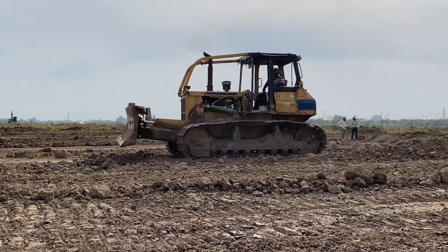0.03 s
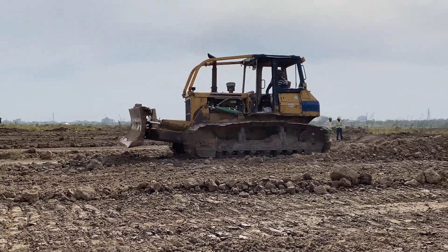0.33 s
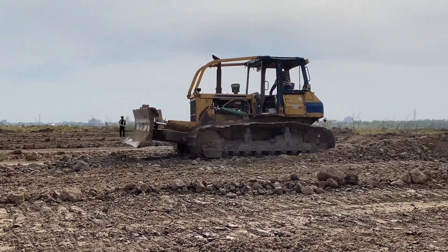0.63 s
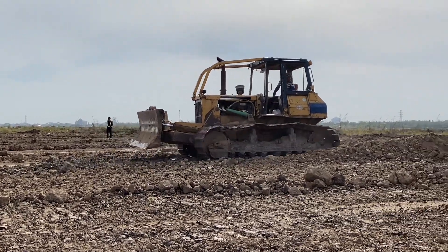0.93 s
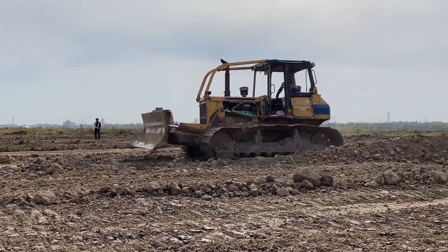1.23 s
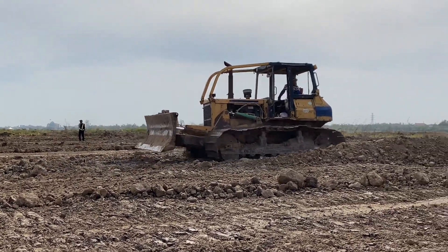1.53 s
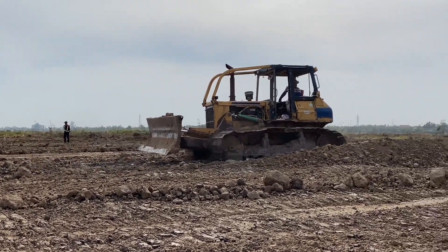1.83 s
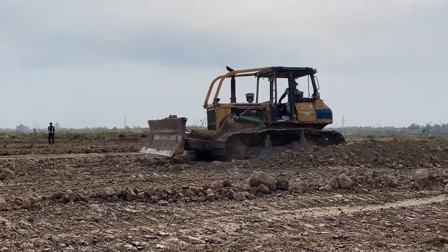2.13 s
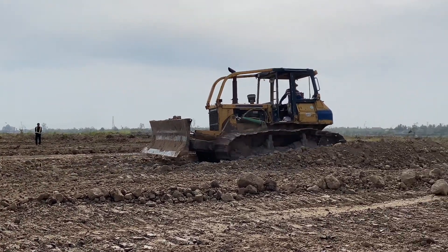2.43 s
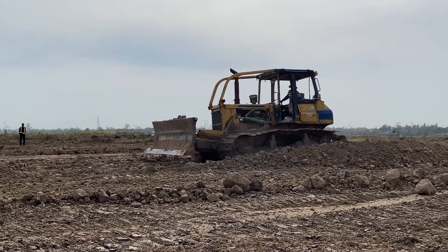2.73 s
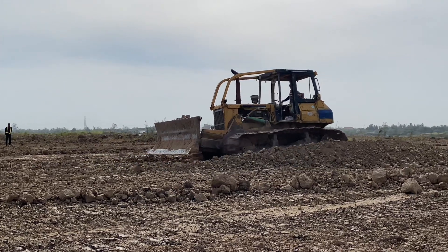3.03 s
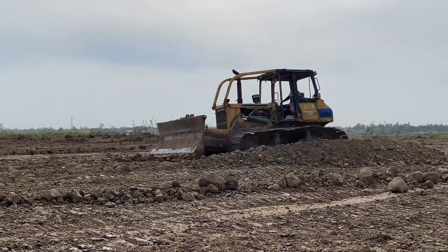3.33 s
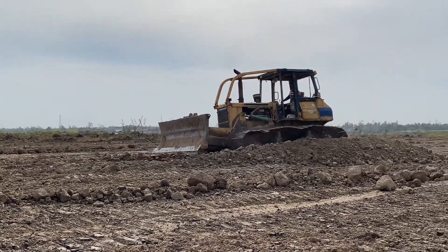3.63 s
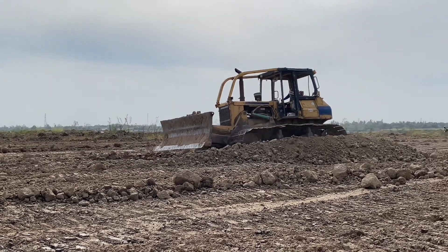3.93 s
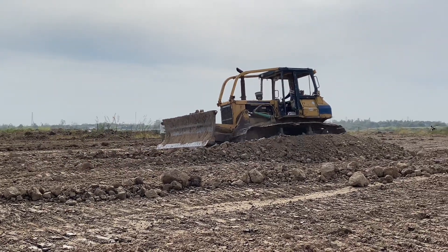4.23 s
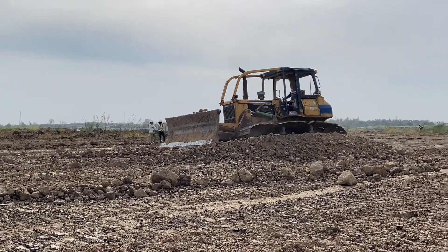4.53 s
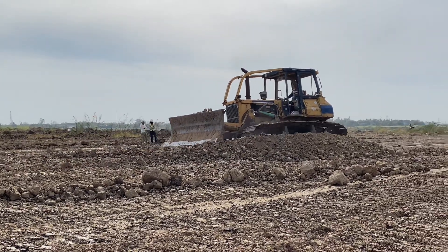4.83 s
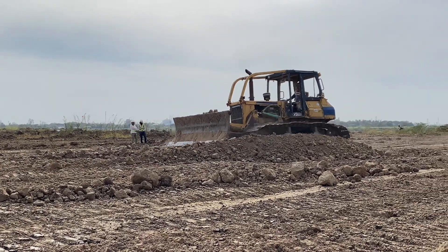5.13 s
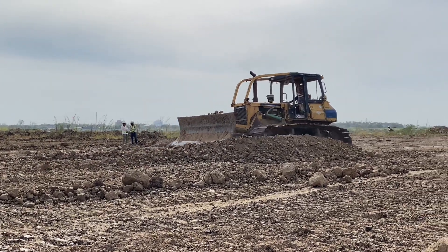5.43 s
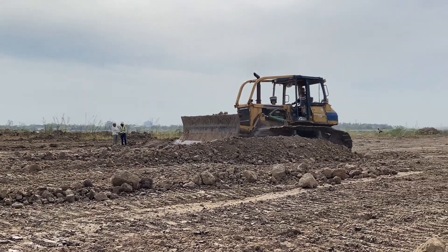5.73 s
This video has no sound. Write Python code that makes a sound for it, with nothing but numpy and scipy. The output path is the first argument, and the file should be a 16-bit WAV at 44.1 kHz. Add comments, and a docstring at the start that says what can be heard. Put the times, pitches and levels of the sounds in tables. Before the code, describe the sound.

A diesel bulldozer drones and clatters while its steel tracks grind, knock and squeak, with gusts buffeting the microphone.

```python
"""An open, windy site: a diesel bulldozer crawls over a mound of soil.
The exhaust drones at the firing rate and each firing makes the block clatter.
The steel tracks grind grit, crush stones, scrape, knock on the rollers and squeak on dry pins.
Gusts rumble, buffet and thump on the two ports of the microphone."""
import sys
import numpy as np
from scipy import signal
from scipy.fft import rfft, irfft
from scipy.io import wavfile
from scipy.ndimage import uniform_filter1d

SR = 44100
rng = np.random.default_rng(int(sys.argv[2]) if len(sys.argv) > 2 else 0)


def transcribe(signal):
    """Save signal, clipped to [-1, 1], as a 16-bit WAV file at the path in sys.argv[1]."""
    frames = np.atleast_2d(signal).T
    limited = np.clip(frames, -1, 1)
    pcm = np.round(limited * 32767).astype(np.int16)
    wavfile.write(sys.argv[1], SR, pcm)


N = 263718
TIME, FREQS = np.arange(N) / SR, np.fft.rfftfreq(N, 1 / SR)
LINK_PERIOD_S, FIRST_LINK_S = 0.339, 0.32  # links bending over the sprocket

# machine slowly moving away: (time [s], clatter [dB], grinding [dB])
MACHINE_LEVELS = [(0, -25.5, -40), (.3, -25.5, -39.5), (.9, -25.5, -43), (2.3, -27, -46.5),
                  (3.1, -26, -43.5), (3.7, -28, -45), (4.1, -28.5, -43), (4.5, -27.5, -44),
                  (5.98, -28.5, -44.5)]
# wind between gusts: (time [s], rumble [dB], buffeting [dB])
BREEZE_LEVELS = [(0, -30, -29.5), (1.1, -25.5, -31), (2, -27.5, -31), (2.55, -24.5, -34),
                 (2.9, -23.5, -30.5), (3.7, -26.5, -30), (4.4, -22, -32.5), (5.1, -27, -30),
                 (5.98, -26, -26.5)]
# link friction: (time [s], level [dB])
RUB_LEVELS = [(0, -48), (.9, -41), (1.7, -37.5), (2, -45), (3.2, -47), (4.05, -34.5), (4.3, -48),
              (4.7, -35.5), (5.2, -38.5), (5.98, -41)]


def amp(db):
    """Decibels to gain."""
    return 10 ** (np.asarray(db) / 20)


def unit(x):
    """Scale to rms 1."""
    return x / np.sqrt(np.mean(x ** 2) + 1e-20)


def curve(rows, column=1):
    """One column of a time table at every sample."""
    rows = np.asarray(rows)
    return np.interp(TIME, rows[:, 0], rows[:, column])


def colour(x, spectrum):
    """Filter by (frequency [Hz], level [dB]) points; rms 1."""
    hz, db = np.transpose(spectrum)
    size = x.shape[-1]
    gain = amp(np.interp(np.log(np.fft.rfftfreq(size, 1 / SR) + 1), np.log(hz), db))
    return unit(irfft(rfft(x) * gain, size))


def noise(spectrum, shape=N):
    """Coloured noise, rms 1."""
    return colour(rng.standard_normal(shape), spectrum)


def wander(lo_hz, hi_hz):
    """Random drift between two rates, rms 1."""
    band = FREQS / (FREQS + lo_hz) / (1 + (FREQS / hi_hz) ** 2)
    return unit(irfft(rfft(rng.standard_normal(N)) * band, N))


def port_noise(side_db):
    """Noise at two ports: a common part and an opposed part."""
    mid, side = rng.standard_normal((2, N))
    return np.array([mid + amp(side_db) * side, mid - amp(side_db) * side])


def add(mix, start_s, sound):
    """Mix a sound in, cut at the end."""
    part = mix[max(round(start_s * SR), 0):][:len(sound)]
    part += sound[:len(part)]


def patchy(x, wide_db, ring_db):
    """Shift colour in brief wide patches, and in longer narrow ones where steel plates ring on."""
    for window, db in ((512, wide_db), (2048, ring_db)):
        frames = signal.stft(x, nperseg=window)[2]
        patches = uniform_filter1d(rng.standard_normal(frames.shape), size=3, axis=0)
        patches = uniform_filter1d(patches, size=4, axis=1)
        x = signal.istft(frames * amp(db * unit(patches)))[1][:N]
    return unit(x)


def scatter(x, t60_s):
    """Short spray of echoes off hull and clods."""
    t = np.arange(SR // 4) / SR
    tail = rng.standard_normal(len(t)) * amp(-60 * t / t60_s)
    return signal.oaconvolve(x, tail / np.linalg.norm(tail))[:N]


def gusts(rise_s=0.013, fall_s=0.034, lull_flutter_db=-40):
    """Buffeting and flutter levels [dB]: each gust rises fast, holds, falls back to the breeze."""
    # gusts at the microphone: (start [s], length [s], buffeting [dB], flutter [dB])
    blasts = [(0, 0.12, -20.5, -34.5), (0.224, 0.33, -20, -29.5), (0.573, .08, -18, -28),
              (0.744, 0.14, -23, -46), (0.886, 0.18, -21, -29), (1.175, 0.13, -27, -21),
              (1.338, 0.14, -29.5, -24.5), (1.67, 0.076, -35, -27.5), (1.888, .19, -47, -27),
              (2.662, 0.098, -27, -19), (2.832, 0.2, -27.5, -20.5), (3.07, 0.15, -41, -27),
              (3.313, 0.27, -32.5, -51), (3.535, 0.039, -23, -25.5), (3.919, 0.17, -29, -30.5),
              (4.312, 0.3, -25, -30), (4.846, 0.043, -24, -22.5), (5.52, 0.19, -27.5, -31),
              (5.864, 0.077, -26, -29.5)]
    buffet_power, flutter_power = amp(curve(BREEZE_LEVELS, column=2)) ** 2, amp(lull_flutter_db) ** 2
    for start_s, length_s, buffet_db, flutter_db in blasts:
        onset = (1 + np.tanh((TIME - start_s) / rise_s)) / 2
        release = (1 - np.tanh((TIME - start_s - length_s) / fall_s)) / 2
        buffet_power += onset * release * amp(buffet_db) ** 2
        flutter_power += onset * release * amp(flutter_db) ** 2
    return 10 * np.log10(buffet_power), 10 * np.log10(flutter_power)


def wind(lump_db=3.5, flicker_db=3.0, rumble_follow=0.17):
    """Eddies on the ports: deep rumble, lumpy buffets, brighter flutter in fast gusts."""
    # wind spectra: (frequency [Hz], level [dB])
    rumble_spectrum = [(15, -50), (30, -23), (45, 2.5), (62, 8), (80, 12.5), (110, 7.5), (160, -9.5),
                       (400, -72)]
    buffet_spectrum = [(30, -46), (70, -11), (130, -0.5), (200, -3), (290, -5.5), (450, -16), (900, -30),
                       (3000, -96)]
    flutter_spectrum = [(80, -30), (220, -10.5), (350, 2), (520, 1.5), (750, 0), (1000, -10.5), (1500, -25),
                        (2200, -57), (5000, -95)]
    buffet_db, flutter_db = gusts()
    rumble_db = curve(BREEZE_LEVELS) + rumble_follow * (buffet_db - buffet_db.mean())
    eddies = wander(6, 24)
    rumble = colour(port_noise(side_db=-14), rumble_spectrum)
    buffet = colour(port_noise(side_db=-5) * amp(lump_db * eddies), buffet_spectrum)
    turbulence = port_noise(side_db=-6.5) * amp(flicker_db * unit(eddies + wander(2.3, 29)))
    flutter = colour(turbulence, flutter_spectrum)
    return amp(rumble_db) * rumble + amp(buffet_db + 2) * buffet + amp(flutter_db + 4) * flutter


def thumps(rise_s=0.0009, decay_s=0.0056, sag_per_s=5.7, max_lean=0.36):
    """An eddy bursts on a port: a push that dies in a few sagging cycles, stronger on one side."""
    # eddy bursts: (start [s], level [dB], pitch [Hz])
    bursts = [(.23, -1, 149), (.405, -2, 168), (.602, 3, 235), (.958, -3, 161), (1.176, 3, 526),
              (1.279, -1, 546), (1.291, -1, 453), (1.451, -1, 494), (1.896, -8, 442), (2.714, 1, 375),
              (2.881, -5, 480), (2.966, -7, 613), (3.55, -8, 395), (4.862, -3, 451.3)]
    out, t = np.zeros((2, N)), np.arange(SR // 20) / SR
    envelope = (1 - np.exp(-t / rise_s)) * np.exp(-t / decay_s)
    for (start_s, db, hz), (side, offset) in zip(bursts, rng.random((len(bursts), 2))):
        cycles = np.cumsum(hz * np.exp(-sag_per_s * t)) / SR
        push = amp(db - 7) * envelope / envelope.max() * np.sin(2 * np.pi * (cycles + offset))
        lean = max_lean * (2 * side - 1)
        add(out[0], start_s, (1 + lean) * push)
        add(out[1], start_s, (1 - lean) * push)
    return out


def rubbing(gain_db=-4, beat_db=1.0):
    """Links rub hoarsely about their main resonance, harder as each one bends."""
    # link resonance: (frequency [Hz], level [dB])
    link_spectrum = [(3500, -33), (4100, -18), (4350, -2), (4650, 1.5), (4900, 1.5), (5300, -16),
                     (6000, -50)]
    beat = np.cos(2 * np.pi * (TIME - FIRST_LINK_S) / LINK_PERIOD_S)
    rub = patchy(noise(link_spectrum), wide_db=1, ring_db=5)
    return amp(curve(RUB_LEVELS) + gain_db + beat_db * beat) * rub


def small_chirps(count=170, level_db=-44, spread_db=11, fall_db=7, jitter=0.011, length_s=0.019):
    """The many other links give faint, rough chirps, weaker the higher they are."""
    out, drift = np.zeros((2, N)), wander(60, 300)
    window = np.hanning(int(length_s * SR))
    for when, height, force, side in rng.random((count, 4)):
        hz = 3400 * (15500 / 3400) ** height
        span = (int(when * N) + np.arange(len(window))) % N
        phase = 2 * np.pi * np.cumsum(hz * (1 + jitter * drift[span])) / SR
        envelope = amp(level_db + spread_db * force ** 2 - fall_db * height) * window
        for port, shift_rad in zip(out, [0, 2 * height * (side - 0.5)]):
            add(port, when * N / SR, envelope * np.sin(phase + shift_rad))
    return out


def crunches(log_width=0.04, rise_s=0.00091):
    """A stone crushed between steel parts spits a short hiss about one pitch."""
    # crushed stones: (start [s], level [dB], centre [Hz], t60 [s])
    stones = [(.23, -32, 14700, .25), (.415, -35, 8550, .2), (.655, -33.5, 9830, 0.35),
              (2.891, -33, 5590, 0.12), (3.003, -26, 6500, .06), (3.345, -30, 14400, 0.091),
              (3.95, -41, 10000, 0.25), (4.52, -36, 10100, .1), (5.285, -29, 14100, .1)]
    out, t = np.zeros(N), np.arange(SR // 4) / SR
    skirt = [(-3, -28), (-1, -8), (0, 0), (1, -8), (3, -28)]  # (offset [widths], level [dB])
    for start_s, db, hz, t60_s in stones:
        band = [(hz * np.exp(offset * log_width), band_db) for offset, band_db in skirt]
        envelope = amp(db - 60 * t / t60_s) * (1 - np.exp(-t / rise_s))
        add(out, start_s, envelope * noise(band, len(t)))
    return out


def grinding(cracks_per_s=120, crack_s=0.0034, grit_db=-14, flicker_db=2.0, diffuse_db=-21):
    """Grit crushed under the shoes: shifting hiss with separate small cracks."""
    # steel grinding in soil: (frequency [Hz], level [dB])
    grit_spectrum = [(800, -34), (2000, 5), (3000, 7.5), (4000, 7.5), (4600, -0.5), (5400, 4), (6500, -1),
                     (8200, 0.5), (10000, -5), (11500, -9.5), (15600, -12.5)]
    cracks = (rng.random(N) < cracks_per_s / SR) * amp(2.5 * np.minimum(rng.exponential(1, N), 4))
    bursts = signal.lfilter([1], [1, -np.exp(-1 / (crack_s * SR))], cracks)
    grit = amp(grit_db) * colour(bursts * rng.standard_normal(N), grit_spectrum)
    hiss = patchy(noise(grit_spectrum), wide_db=1.25, ring_db=3) * amp(flicker_db * wander(2.8, 19))
    # top treble, reaching each port by its own paths: (frequency [Hz], level [dB])
    treble_spectrum = [(7000, -33), (8000, 10), (9100, -58), (10000, -2), (11000, 3),
                       (12200, 21), (13200, -10), (14300, 8), (15000, 15)]
    diffuse = noise(treble_spectrum, (2, N)) * amp(diffuse_db + 2.8 * wander(3, 18))
    return amp(curve(MACHINE_LEVELS, column=2) + 8) * (hiss + grit + diffuse)


def scrapes(log_width=0.22):
    """A shoe dragged along the track frame swells and fades with a hoarse, broad ring."""
    # dragging shoes: (middle [s], level [dB], centre [Hz], length [s])
    drags = [(.55, -20.5, 1550, 0.12), (1.042, -25, 1400, 0.11), (2.42, -21.5, 1500, 0.11),
             (3.691, -25.5, 1330, .18), (4.183, -23.5, 1400, .12)]
    out = np.zeros(N)
    skirt = [(-5, -32), (-1, -7), (0, 0), (1, -7), (5, -36)]  # (offset [widths], level [dB])
    for middle_s, db, hz, length_s in drags:
        swell = np.hanning(int(length_s * SR))
        band = [(hz * np.exp(offset * log_width), band_db) for offset, band_db in skirt]
        add(out, middle_s - length_s / 2, amp(db) * swell * noise(band, SR // 2)[:len(swell)])
    return out


def roller_taps(level_db=-28, spread_db=2, stray_s=0.089, t60_s=0.062):
    """Rows for clanks(): each passing shoe taps a roller."""
    beats_s = np.arange(FIRST_LINK_S, N / SR, LINK_PERIOD_S)
    return [(beat_s + stray_s * late, level_db + spread_db * force, t60_s)
            for beat_s, (late, force) in zip(beats_s, rng.standard_normal((len(beats_s), 2)))]


def clanks(rise_s=0.00067):
    """Soil-packed shoes drop on the rollers: short, dull knocks."""
    # hard knocks: (start [s], level [dB], t60 [s])
    knocks = [(.816, -19, .11), (0.983, -19.5, .061), (1.555, -17, .055), (2.783, -15.5, 0.14),
              (3.004, -14.5, .11), (3.289, -25, .072), (3.419, -20, 0.25), (3.859, -19, .2),
              (4.722, -22, 0.092)]
    # ring of a shoe: (frequency [Hz], level [dB])
    shoe_spectrum = [(300, -46), (850, -18), (1200, 6), (1550, 9.5), (2100, 3), (3100, 1), (4200, -5),
                     (6500, -24), (10000, -31), (16000, -46)]
    out, t = np.zeros(N), np.arange(SR // 4) / SR
    for start_s, db, t60_s in knocks + roller_taps():
        envelope = amp(db - 60 * t / t60_s) * (1 - np.exp(-t / rise_s))
        add(out, start_s, envelope * noise(shoe_spectrum, len(t)))
    return out


def link_squeaks(level_db, link_hz, log_spread, stray_s, length_s, spread_db=2, rub_follow=0.4):
    """Rows for squeaks(): one per link on each track, near a resonance, louder with harder rubbing."""
    beats_s = np.repeat(np.arange(FIRST_LINK_S, N / SR, LINK_PERIOD_S), 2)
    rub_db = np.interp(beats_s, *np.transpose(RUB_LEVELS))
    levels_db = level_db + rub_follow * (rub_db - rub_db.mean())
    late, detune, force = rng.standard_normal((len(beats_s), 3)).T
    rows = zip(beats_s + stray_s * late, link_hz * np.exp(log_spread * detune),
               levels_db + spread_db * force)
    return [(middle_s, hz, db, length_s) for middle_s, hz, db in rows]


def squeaks(jitter=0.0068, bend=0.012, rough_db=2.5, rasp_db=-8, grip=0.19, port_shift_rad=0.067):
    """A dry pin sticks and slips: a bending steel tone in a rasp, purer the harder it grips."""
    # loud pin squeaks: (middle [s], pitch [Hz], level [dB], length [s])
    loud = [(.147, 14100, -28, 0.1), (.282, 7020, -23, 0.019), (.295, 4410, -24, 0.13),
            (.32, 14000, -31, 0.23), (.349, 3144, -27, 0.026), (.675, 4970, -18, 0.064),
            (.761, 4930, -25.5, 0.02), (.863, 4522, -19, 0.035), (.897, 4580, -27, .06),
            (.96, 4760, -29.5, 0.09), (.975, 7920, -32.5, 0.054), (1.108, 7960, -31, .047),
            (1.316, 4270, -33, 0.05), (1.365, 3870, -24.5, 0.046), (1.411, 4980, -25.5, 0.037),
            (1.482, 3030, -17.5, 0.029), (1.597, 4670, -29.5, 0.059), (1.707, 8441, -29, 0.057),
            (1.945, 7460, -34, 0.11), (2.166, 4150, -31.5, .06), (2.508, 4134, -36, 0.026),
            (2.731, 4540, -25, 0.018), (3.258, 8520, -29.5, 0.046), (3.361, 4580, -29, 0.048),
            (3.439, 2607, -26, 0.032), (3.763, 4430, -13.5, 0.047), (3.98, 4620, -26.5, 0.094),
            (4.05, 4480, -33.5, 0.11), (4.115, 4737, -29, .044), (4.18, 2480, -26, .08),
            (4.226, 6920, -36.5, .074), (4.743, 3220, -30, 0.022), (5.11, 4520, -31.5, 0.15),
            (5.402, 5040, -16.5, 0.037), (5.51, 4480, -32, 0.08), (5.776, 4823, -25, 0.051),
            (5.937, 5340, -30, 0.038)]
    out, drift, roughness = np.zeros((2, N)), wander(15, 60), wander(20, 70)
    friction = wander(40, 180) + 1j * wander(40, 210)
    low = link_squeaks(level_db=-37, link_hz=4500, log_spread=0.055, stray_s=0.08, length_s=0.06)
    high = link_squeaks(level_db=-40.5, link_hz=7960, log_spread=0.066, stray_s=0.12, length_s=0.04)
    for middle_s, hz, db, length_s in loud + low + high:
        glide, place = rng.uniform(-0.88, 1, 2)
        progress = np.linspace(0, 1, max(int(length_s * SR), 8))
        span = (int(middle_s * SR) + np.arange(len(progress))) % N
        pitch_hz = hz * (1 + jitter * drift[span] + bend * glide * (2 * progress - 1))
        phase = 2 * np.pi * np.cumsum(pitch_hz) / SR
        tone = sum(amp(harmonic_db) * np.exp(1j * k * phase)
                   for k, harmonic_db in enumerate([0, -24, -30], 1) if k * hz < SR / 2)
        rasp = amp(rasp_db - grip * (db + 44))
        contact = (1 + rasp * friction[span]) / np.sqrt(1 + 2 * rasp ** 2)
        envelope = amp(db + 2 + rough_db * roughness[span]) * np.sin(np.pi * progress ** 0.88) ** 2
        for port, sign in zip(out, (1, -1)):
            shift = np.exp(0.5j * sign * port_shift_rad * place)  # pin's place along the track
            add(port, middle_s - length_s / 2, (envelope * contact * tone * shift).real)
    common_echo = amp(-11) * scatter(out.mean(0), t60_s=0.12)
    port_echoes = amp(-21) * np.array([scatter(port, t60_s=0.1) for port in out])
    return out + common_echo + port_echoes


def clatter(firings, firing_depth=0.16, cylinder_depth=0.08, flicker_db=1.0, turn_s=3.01):
    """Each firing shakes the block; the colour changes as the blade turns to the listener."""
    # block and hood, from the side and from the blade: (frequency [Hz], level [dB])
    side_spectrum = [(100, -31), (300, -16), (540, -20), (720, -3), (870, 3.5), (1130, -3.5), (1350, -2),
                     (1540, 0.5), (1700, -5), (1830, -4), (1980, -13), (2300, -17.5), (3500, -18),
                     (6000, -44.5)]
    blade_spectrum = [(100, -9.5), (300, 2.5), (560, -8), (880, 2), (1100, 1), (1350, 0.5), (1620, 1),
                      (1880, -5.5), (2150, -4), (2300, -10.5), (2520, -2.5), (2800, -11), (3500, -20.5),
                      (6000, -40)]
    scattered_spectrum = [(30, 2), (200, 18), (550, 19.5), (850, 20), (1200, 14), (1900, 3),
                          (2200, -46), (5000, -64.5)]
    phase = 2 * np.pi * firings
    beat = 1 + firing_depth * np.cos(phase) + cylinder_depth * np.cos(phase / 6)
    beat *= amp(flicker_db * wander(8.5, 34))
    side, blade = (colour(patchy(rng.standard_normal(N), wide_db=2, ring_db=2) * beat, spectrum)
                   for spectrum in (side_spectrum, blade_spectrum))
    facing = 0.5 + 0.5 * np.tanh((TIME - turn_s) / 0.44)
    direct = np.sqrt(1 - facing) * side + np.sqrt(facing) * blade
    scattered = amp(-6.5) * noise(scattered_spectrum)
    return amp(curve(MACHINE_LEVELS) + 2.5) * np.array([direct + scattered, direct - scattered])


def exhaust(firings, fading_db=2.6):
    """Firing tone with weak side orders from unequal cylinders; moving air fades it in and out."""
    # drone, loud under load, fading as the machine turns away: (time [s], level [dB])
    drone_levels = [(0, -15), (.1, -9.5), (.35, -12.5), (.66, -17.5), (.96, -17.5), (1.08, -22), (1.7, -27),
                    (2.2, -25.5), (2.28, -16), (2.6, -14.5), (2.9, -29.5), (3.25, -32), (3.38, -19),
                    (3.7, -30), (4.6, -29.5), (5.98, -25.5)]
    # exhaust partials: (order [x firing rate], level [dB])
    partials = [(2 / 3, -17.5), (5 / 6, -16), (1, 0.5), (7 / 6, -11.5), (2, -25)]
    tones = sum(amp(db) * np.sin(2 * np.pi * (order * firings + rng.random())) for order, db in partials)
    return amp(curve(drone_levels) - 2) * unit(tones * amp(fading_db * wander(4.4, 12)))


def scene():
    """The machine reaches the two ports with a phase between them; wind acts on the ports directly."""
    # engine speed: (time [s], firing rate [Hz])
    firing_rate = [(0, 99), (.25, 94), (.95, 98), (1.2, 98), (1.9, 98.3), (3.4, 98), (4.8, 108), (5.98, 89)]
    # lead of the left port: (frequency [Hz], phase [rad])
    port_lead = [(0, 0), (950, 0), (1300, -.6), (1650, -.55), (2000, 0), (7250, 0), (8900, -np.pi),
                 (9250, -np.pi), (10650, -2 * np.pi), (11700, -2 * np.pi), (11900, -7.5),
                 (12900, -3 * np.pi), (13500, -3 * np.pi), (14050, -10.4), (14750, -4 * np.pi)]
    firings = np.cumsum(curve(firing_rate)) / SR
    engine = clatter(firings) + exhaust(firings)
    tracks = grinding() + squeaks() + small_chirps() + clanks() + scrapes() + crunches() + rubbing()
    lead_rad = np.interp(FREQS, *np.transpose(port_lead))
    machine = irfft(rfft(engine + tracks) * np.exp(0.5j * np.array([lead_rad, -lead_rad])), N)
    return machine + wind() + thumps()


def record(dry):
    """Soft overload on the largest peaks, then a low-pass."""
    edge_hz = 15800
    limited = dry / (1 + dry ** 8) ** (1 / 8)
    low_pass = signal.firwin(511, edge_hz, window=("kaiser", 9), fs=SR)
    return signal.oaconvolve(limited, low_pass[None], "same")


dry = scene()
out = record(dry)
transcribe(out)
```